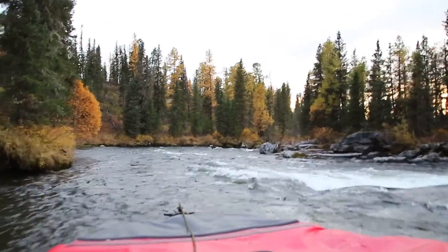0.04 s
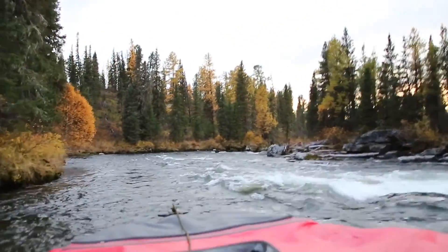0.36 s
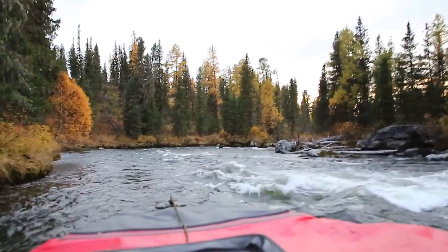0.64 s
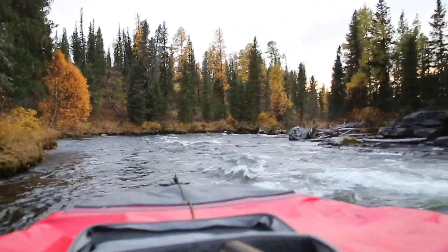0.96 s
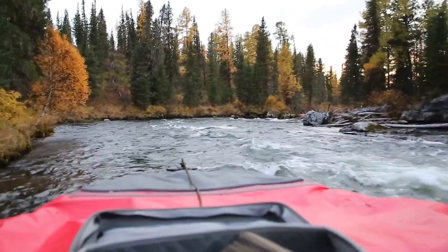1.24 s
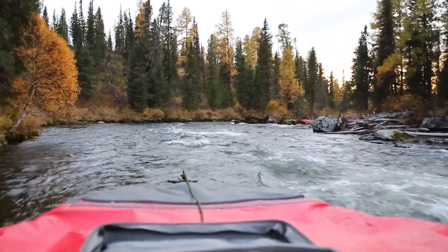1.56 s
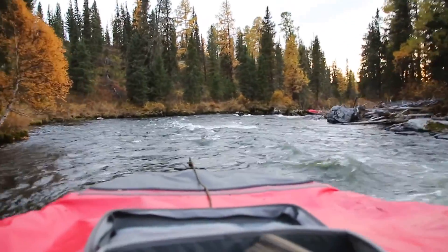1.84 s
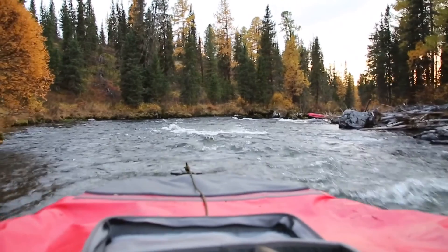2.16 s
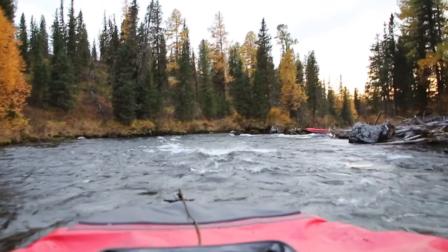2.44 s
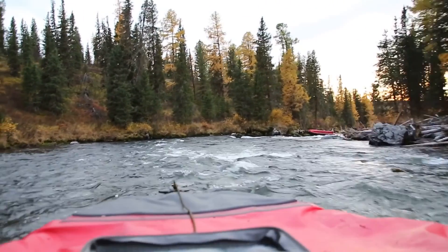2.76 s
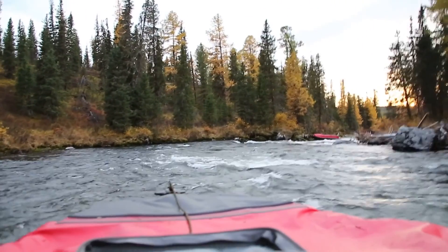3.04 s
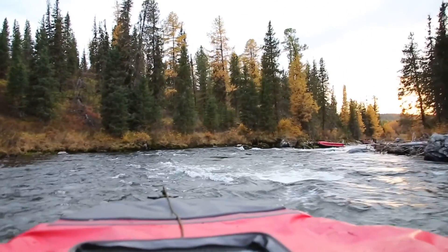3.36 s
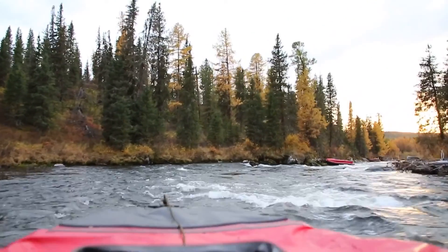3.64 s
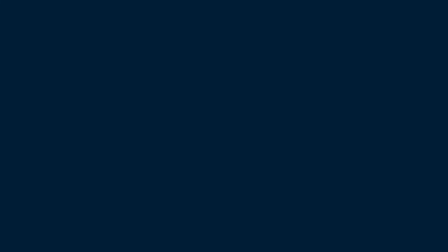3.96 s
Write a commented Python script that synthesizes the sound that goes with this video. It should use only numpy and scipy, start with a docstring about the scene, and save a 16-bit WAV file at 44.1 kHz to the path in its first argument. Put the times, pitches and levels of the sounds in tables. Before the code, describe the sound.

A small boat motor, heard from on board, drones at full throttle, then sputters and slows in two steps. River water rushes and lightly slaps the bow while wind buffets the microphone, and everything gradually fades.

```python
"""Small motorboat on a fast river

Heard from on board, a three-cylinder two-stroke motor drones at full throttle, eases off and
fires unevenly while it slows, cruises, then slows again. Water rushes and spatters at the hull,
wind buffets the microphone and waves slap the bow. The whole sound fades and then stops."""
import sys
import numpy as np
from scipy import signal
from scipy.io import wavfile
from scipy.ndimage import uniform_filter1d

SR = 44100
rng = np.random.default_rng(int(sys.argv[2]) if len(sys.argv) > 2 else 0)


def master_out(mix):
    """Clip the mix to full scale and print it as 16-bit PCM to the path in sys.argv[1]."""
    frames = np.transpose(np.atleast_2d(mix))
    ceiling = np.clip(frames, -1, 1)
    pcm = np.round(ceiling * 32767).astype(np.int16)
    wavfile.write(sys.argv[1], SR, pcm)


N = 176400
TIME = np.arange(N) / SR


def from_db(db):
    """Turn decibels into a number to multiply by."""
    return 10 ** (np.asarray(db) / 20)


def rms_one(x):
    """Scale a signal so its average strength (rms) is 1."""
    return x / np.sqrt(np.mean(x ** 2) + 1e-20)


def in_time(rows):
    """Join (time_s, value) points with straight lines, one value per sample."""
    return np.interp(TIME, *np.transpose(rows))


def drift(rate_hz):
    """A smooth random wander of strength 1; a higher rate wanders faster."""
    step, warm_up = 40, 2000
    r = np.exp(-2 * np.pi * step * rate_hz / SR)
    noise = rng.standard_normal(N // step + warm_up + 2)
    slow = signal.lfilter([1], [1, -2 * r, r * r], noise)[warm_up:]
    return np.interp(np.arange(N) / step, np.arange(len(slow)), rms_one(slow))


def wavering(phase, depth, rate_hz=8.2):
    """A tone of strength 1 whose loudness and phase wander."""
    tone = (1 + depth * drift(rate_hz)) * np.sin(phase) + depth * drift(rate_hz) * np.cos(phase)
    return np.sqrt(2 / (1 + 2 * depth ** 2)) * tone


def banded_noise(colour, flicker_db, flicker_hz):
    """Noise of strength 1 in flickering bands; the colour table says which pitches are strong."""
    pitches, levels = np.transpose(colour)
    edges = 17.3 * 2 ** (np.arange(31) / 3)  # three bands per octave
    out, together, white = 0, drift(flicker_hz), rng.standard_normal((2, N))
    for k, (low, high) in enumerate(zip(edges, edges[1:])):
        flicker = .5 * together + drift(flicker_hz)
        if high > pitches[0] and low < pitches[-1]:
            band_filter = signal.butter(3, [low, high], "band", fs=SR, output="sos")
            level_db = np.interp(np.log(np.sqrt(low * high)), np.log(pitches), levels)
            out += signal.sosfilt(band_filter, white[k % 2]) * from_db(level_db + flicker_db * flicker)
    return rms_one(out)


# The exhaust drone, swelling as the boat rides the waves: time_s, level_db
DRONE_LEVEL = [(0.0, -14.3), (0.2, -10.5), (0.24, -13.5), (0.38, -15), (0.44, -10.5), (0.5, -21),
               (0.7, -14.5), (0.82, -17.5), (0.9, -9.9), (0.98, -16.5), (1.26, -11.3), (1.34, -16.5),
               (1.44, -14.5), (1.7, -18), (1.76, -11), (1.86, -14.5), (2.34, -11), (2.4, -16),
               (2.62, -11.5), (2.82, -16), (2.9, -12.5), (3.06, -15), (3.16, -11.5), (3.4, -18.5),
               (3.52, -18), (3.7, -20)]
# How much misfires shake that level: time_s, depth_db
SPUTTER_DEPTH = [(0, .8), (1.3, .6), (1.42, 2.0), (1.68, 3.0), (1.76, .5), (3.2, .8), (3.35, 2.2),
                 (3.7, 2.0)]
# A tone one octave above the drone that comes and goes: time_s, level_db
OCTAVE_LEVEL = [(0, -23), (.07, -17), (.14, -36), (.24, -17), (.31, -35), (.46, -26), (.57, -27),
                (.66, -19), (.74, -25.5), (.84, -19), (.95, -36), (1.14, -41.5), (1.24, -26), (1.34, -22),
                (1.43, -41), (1.52, -30), (1.68, -35.5), (1.81, -26), (1.88, -32), (1.98, -30.5),
                (2.33, -24), (2.48, -33), (2.6, -26.5), (2.79, -26), (2.87, -40), (2.99, -24.5),
                (3.2, -21.5), (3.38, -26), (3.7, -23)]

def exhaust(firing, sputter_hz=35):
    """The firings blend into a drone and its octave; misfires make the drone sputter."""
    shake = drift(sputter_hz)
    slow_part = uniform_filter1d(shake, size=int(2 * SR / sputter_hz))
    sputter_db = in_time(SPUTTER_DEPTH) * rms_one(shake - slow_part)
    drone = np.sqrt(2) * from_db(in_time(DRONE_LEVEL) + sputter_db) * np.sin(firing)
    return drone + from_db(in_time(OCTAVE_LEVEL)) * wavering(2 * firing, depth=.47)


# The motor's howl: time_s, level_db
HOWL_LEVEL = [(0, -24), (.25, -27), (.36, -24), (.5, -26), (.63, -20), (.76, -26), (.83, -24.5),
              (1.0, -31.5), (1.25, -49), (2.0, -47.5), (3.7, -43)]
# The thin ring above it: time_s, level_db
RING_LEVEL = [(0, -50), (.28, -48), (.37, -36), (.45, -48), (.53, -43.5), (.68, -45.5), (.85, -48.5),
              (1.15, -70.5)]

def howl_and_ring(shaft):
    """Two tones, at 7 and 29 times the crankshaft's speed, swell and sink at full throttle."""
    howl = from_db(in_time(HOWL_LEVEL)) * wavering(7 * shaft, depth=.2)
    ring = from_db(in_time(RING_LEVEL)) * wavering(29 * shaft, depth=.2)
    return howl + ring


# Pitches where the boat's hull resonates: pitch_hz, half_width_hz, lift_db
HULL_RESONANCES = [(446.7, 11, 10.5), (650, 40, 7.5), (806, 14, 7)]
# Tones of the turning crankshaft: cycles_per_turn, full_throttle_db, cruising_db
SHAFT_TONES = [(1, -42, -53), (2, -34, -34), (4, -30.5, -42.5), (5, -31, -39), (8, -44.5, -43.5),
               (9, -43, -40.5), (10, -59.5, -51.5), (11, -49, -55.5), (12.05, -50.5, -48.5),
               (14.08, -50.5, -54), (26, -51, -59.5)]

def shaft_hum(shaft, shaft_hz, throttle):
    """The crankshaft hums with many tones; the hull lifts those near its resonances."""
    depth = np.interp(throttle, [0, 1], [.59, .22])  # steadier at full throttle
    hum = 0
    for multiple, full_db, cruising_db in SHAFT_TONES:
        level_db = cruising_db + (full_db - cruising_db) * throttle
        for pitch_hz, width_hz, lift_db in HULL_RESONANCES:
            level_db += lift_db * np.exp(-((multiple * shaft_hz - pitch_hz) / width_hz) ** 2)
        phase = round(multiple) * shaft + rng.uniform(0, 2 * np.pi)
        hum += from_db(level_db) * wavering(phase, depth)
    return hum


# High tones of the moving parts: cycles_per_turn, full_throttle_db
WHINE_TONES = [(20, -46), (21, -49.5), (24, -50), (26, -54), (32, -46.5), (33, -52), (35, -45.5),
               (38, -49.5), (42, -55.5), (44, -49), (45, -54), (47, -53), (48, -52), (50, -47)]

def whine(shaft, throttle):
    """A mechanical whine that falls away as the throttle closes."""
    tones = 0
    for multiple, level_db in WHINE_TONES:
        phase = multiple * shaft + rng.uniform(0, 2 * np.pi)
        tones += from_db(level_db) * wavering(phase, depth=.8)
    return throttle ** 2 * tones


# The colour of the motor's clatter: pitch_hz, relative_db
CLATTER_COLOUR = [(60, -29.5), (130, -5), (220, 7.5), (300, -1.5), (450, 3.5), (620, -8.5), (1000, -19),
                  (2000, -18), (3000, -18), (4000, -19.5), (5000, -35), (10000, -48)]

def clatter(shaft, firing, throttle):
    """Rough noise that pulses with each turn and each firing, louder with more throttle."""
    pulses = rms_one(np.exp(.245 * (np.cos(shaft) + np.cos(firing))))
    level_db = -24.5 - 10.5 * (1 - throttle)
    return from_db(level_db) * pulses * banded_noise(CLATTER_COLOUR, flicker_db=1.0, flicker_hz=11)


# How often the motor fires: time_s, rate_hz
FIRING_RATE = [(0, 224), (.44, 223), (.52, 225.3), (.98, 230), (1.14, 215.2), (1.3, 211.2), (1.44, 190.6),
               (1.64, 177.2), (1.84, 171.8), (2.4, 169.1), (3.14, 170.2), (3.34, 155.7), (3.54, 145.5),
               (3.7, 142.1)]
# The throttle, from cruising (0) to wide open (1): time_s, opening
THROTTLE_OPENING = [(0, 1), (.45, 0.99), (.65, 1), (.9, 0.96), (1.05, 0.59), (1.3, 0.27), (1.55, 0.21)]

def motor(cylinders=3, jitter_rad=.013):
    """Each cylinder fires once per turn of the crankshaft, which drives all the motor's sounds."""
    throttle = in_time(THROTTLE_OPENING)
    shaft_hz = in_time(FIRING_RATE) / cylinders
    shaft = 2 * np.pi * np.cumsum(shaft_hz) / SR + jitter_rad * drift(18)  # angle turned so far
    firing = cylinders * shaft
    return (exhaust(firing) + howl_and_ring(shaft) + shaft_hum(shaft, shaft_hz, throttle)
            + whine(shaft, throttle) + clatter(shaft, firing, throttle) + burble(firing))


# How loud the rushing water is: time_s, level_db
WATER_LEVEL = [(0, -28.5), (1, -33), (1.4, -32), (1.7, -36), (2.1, -32.5), (2.45, -36.5), (2.6, -33),
               (2.8, -36), (3.3, -34), (3.7, -31.5)]
# Its colour: pitch_hz, relative_db
WATER_COLOUR = [(130, -0.5), (300, 3.5), (550, -3), (800, -6), (1100, -13.5), (1700, -13.5), (2600, -18),
                (4000, -16.5), (5000, -26.5), (8000, -36.5), (14000, -51.5)]

def rushing_water():
    """Water streams past the hull with a broad rush."""
    return from_db(in_time(WATER_LEVEL)) * banded_noise(WATER_COLOUR, flicker_db=.84, flicker_hz=10)


def drops(per_second=1500, ring_cycles=12):
    """Droplets and small bubbles burst at random, each ringing for a few cycles."""
    sizes = from_db(-.5 * np.minimum(rng.exponential(1, N), 5)) * rng.choice([-1, 1], N)
    clicks = sizes * (rng.random(N) < per_second / SR)
    pitches_hz = np.geomspace(1500, 13000, 20)
    chosen_pitch = rng.integers(0, len(pitches_hz), N)
    out = 0
    for k, hz in enumerate(pitches_hz):
        decay = from_db(-60 * hz / (ring_cycles * SR))
        angle = 2 * np.pi * hz / SR
        feedback = [1, -2 * decay * np.cos(angle), decay ** 2]
        ringing = signal.lfilter([1, 0, -1], feedback, clicks * (chosen_pitch == k) + 1e-18)
        out += np.sqrt(np.sin(angle)) * ringing
    return rms_one(out)


# How loud the spray is: time_s, level_db
BOW_SPRAY_LEVEL = [(0.0, -45), (0.52, -46), (0.56, -43.5), (1.34, -46.5), (1.4, -46.3), (1.58, -50),
                   (1.9, -51), (2.1, -45), (2.16, -50.5), (2.32, -48.5), (2.42, -53.2), (2.6, -49),
                   (2.76, -51.9), (3.06, -44.5), (3.26, -49), (3.7, -49)]
# The colour of its hiss: pitch_hz, relative_db
HISS_COLOUR = [(1500, -13.5), (4000, 8.5), (5500, 1), (7000, 4), (10000, -3.5), (13500, -4.5),
               (15000, -14.5)]

def spray(hiss_db=-.5, drops_db=-5):
    """Spray from the bow hisses and spatters."""
    hiss = from_db(hiss_db) * banded_noise(HISS_COLOUR, flicker_db=1.46, flicker_hz=13)
    return from_db(in_time(BOW_SPRAY_LEVEL)) * (hiss + from_db(drops_db) * drops())


# How loud the wind is: time_s, level_db
HEADWIND_LEVEL = [(0, -32), (.7, -28.5), (1.2, -32), (1.8, -32.5), (2.5, -37.5), (3.2, -37), (3.7, -33)]
# Its colour: pitch_hz, relative_db
WIND_COLOUR = [(25, -28.5), (35, -14.5), (50, -2.5), (80, -3.5), (130, -2.5), (250, -9.5), (600, -44.5)]

def wind(gust_db=1.8):
    """The headwind hits the microphone in gusts, making a lumpy low rumble."""
    level_db = in_time(HEADWIND_LEVEL) + gust_db * drift(8)
    return from_db(level_db) * banded_noise(WIND_COLOUR, flicker_db=1.0, flicker_hz=13)


# Waves hitting the bow: start_s, peak_db, decay_s
WAVE_SLAPS = [(.345, -33, 0.033), (0.559, -31.5, .13), (1.385, -37.5, 0.046), (2.522, -38, 0.022)]
# The colour of their splashes: pitch_hz, relative_db
SPLASH_COLOUR = [(700, 2), (1200, -2), (2200, -1), (3000, 0), (4000, -2), (4900, -12.5), (9000, -22.5)]

def splashes(rise_s=.017):
    """Each wave slaps the bow with a splash that rises quickly and dies away as a hiss."""
    swell = 0
    for start_s, peak_db, decay_s in WAVE_SLAPS:
        rise = np.clip((TIME - start_s) / rise_s, 0, 1)
        fall = np.exp(-np.maximum(TIME - start_s - rise_s, 0) / decay_s)
        swell += from_db(peak_db) * rise * fall
    return swell * banded_noise(SPLASH_COLOUR, flicker_db=-1.5, flicker_hz=25)


# The burble as the motor first slows: time_s, level_db
BURBLE_LEVEL = [(1.28, -55), (1.37, -21), (1.47, -21.5), (1.58, -28.5), (1.7, -27), (1.78, -50)]

def burble(firing):
    """As the motor eases off, every second firing is weak, adding a tone an octave below the drone."""
    return np.sqrt(2) * from_db(in_time(BURBLE_LEVEL)) * np.sin(firing / 2)


def scene():
    """Motor, water and wind together in one channel."""
    return (motor() + rushing_water() + spray() + splashes() + wind())[None, :]


def record(dry):
    """Fade the sound steadily, stop it suddenly and cut off the highest treble."""
    fade_start_s, fade_end_s, stop_s, cutoff_hz = .93, 3.945, 3.735, 15000
    fade = np.clip((fade_end_s - TIME) / (fade_end_s - fade_start_s), 0, 1)
    stop = np.clip((stop_s - TIME) / .01, 0, 1)
    treble_cut = signal.ellip(10, .1, 90, cutoff_hz, fs=SR, output="sos")
    return signal.sosfilt(treble_cut, dry * fade * stop + 1e-18)


dry = scene()
out = record(dry)
master_out(out)
```